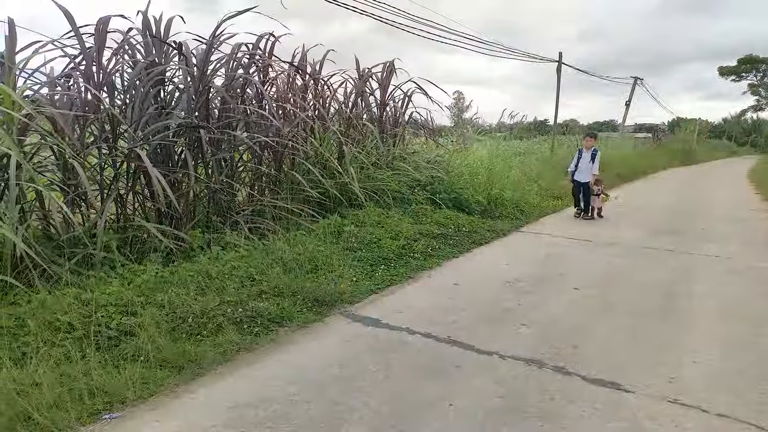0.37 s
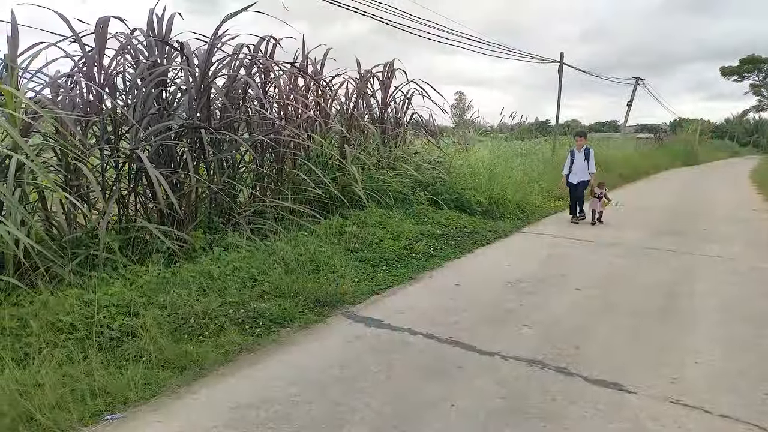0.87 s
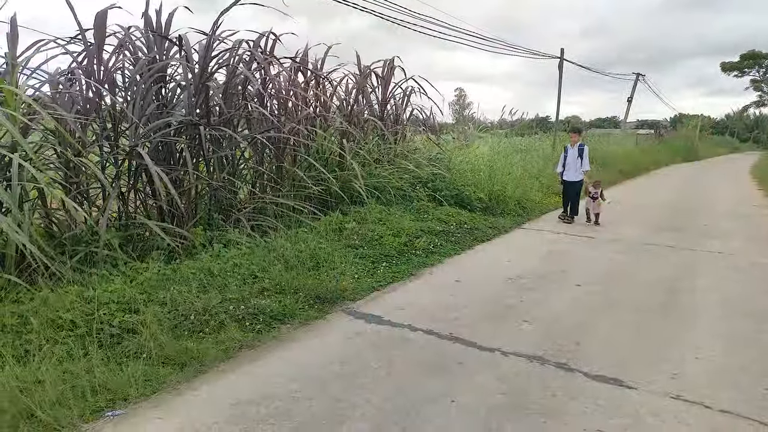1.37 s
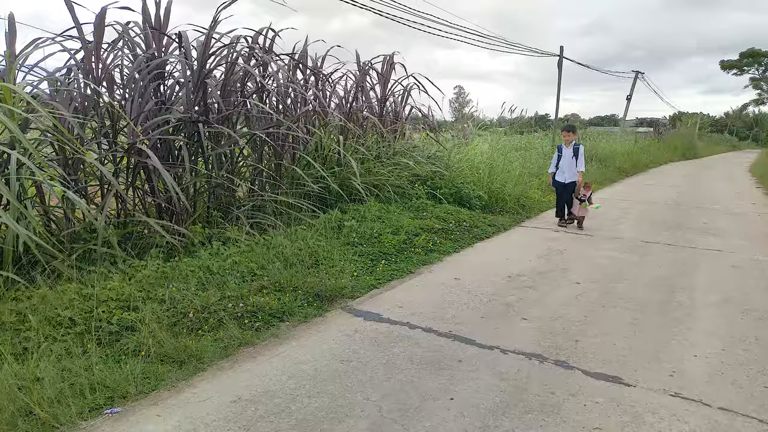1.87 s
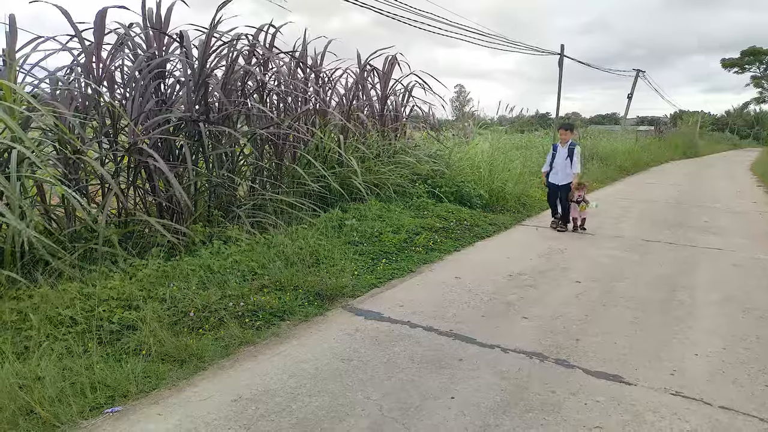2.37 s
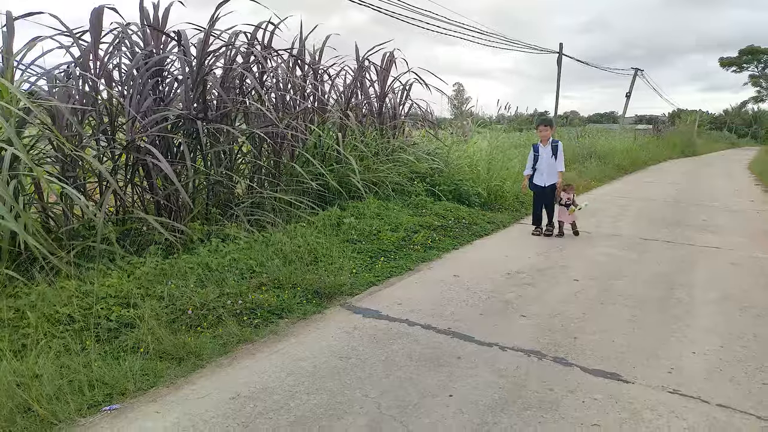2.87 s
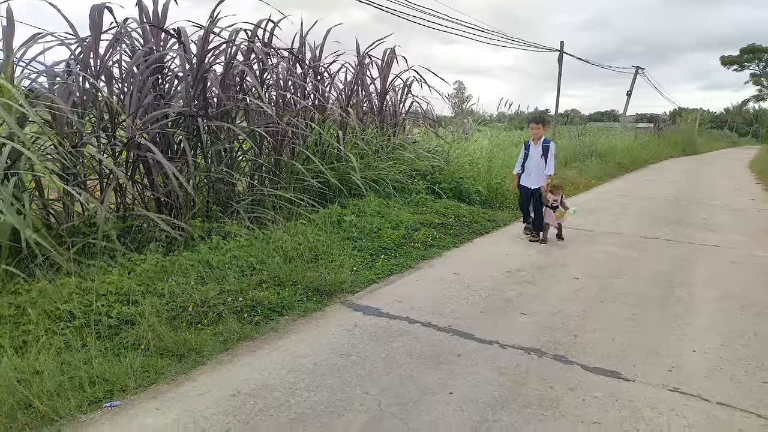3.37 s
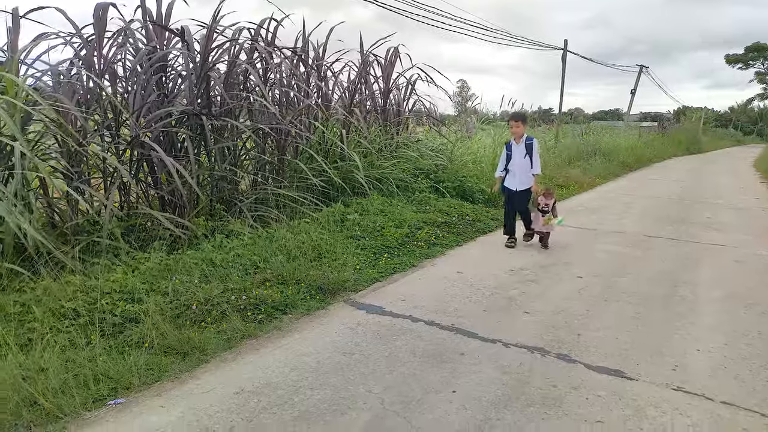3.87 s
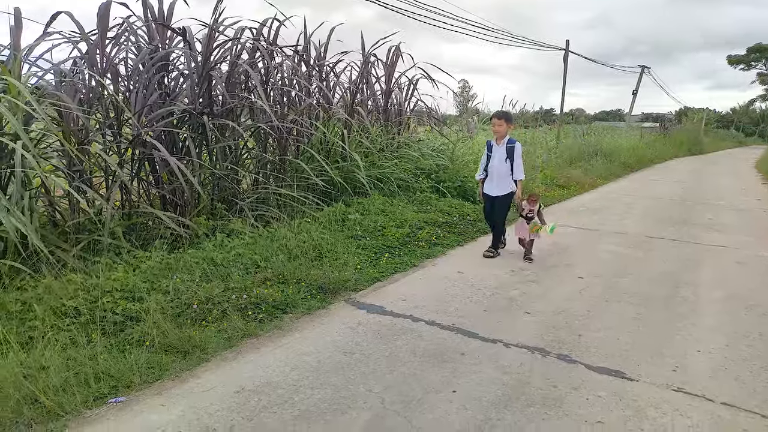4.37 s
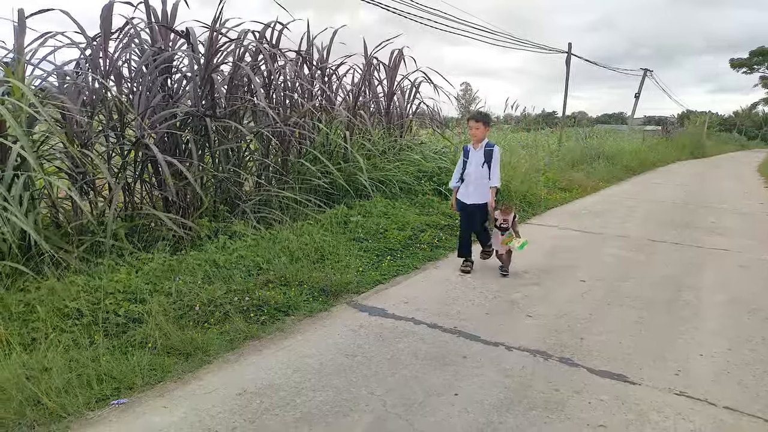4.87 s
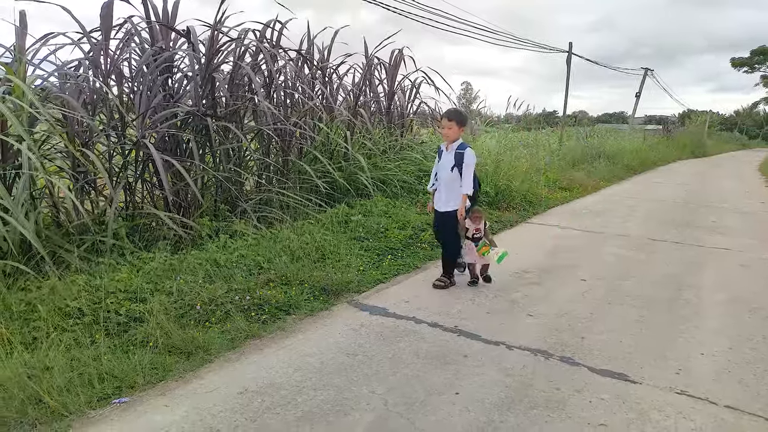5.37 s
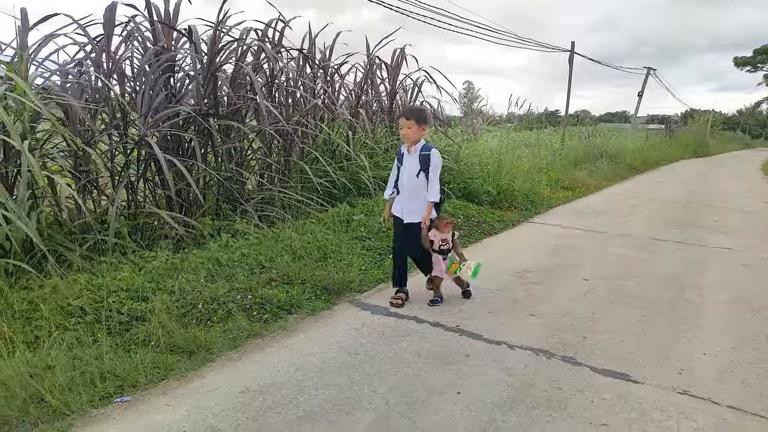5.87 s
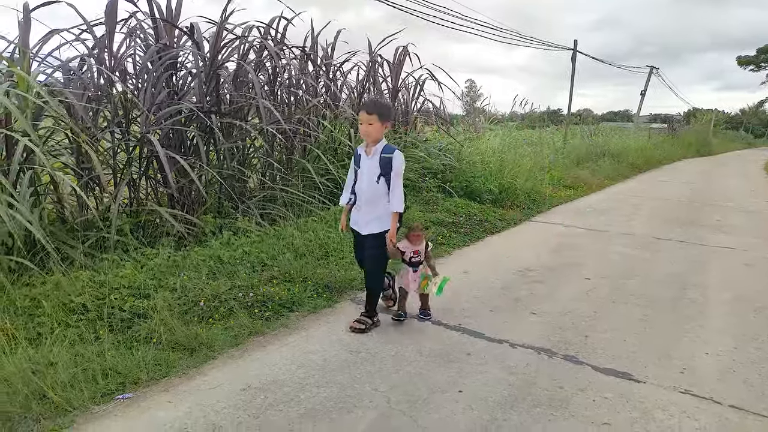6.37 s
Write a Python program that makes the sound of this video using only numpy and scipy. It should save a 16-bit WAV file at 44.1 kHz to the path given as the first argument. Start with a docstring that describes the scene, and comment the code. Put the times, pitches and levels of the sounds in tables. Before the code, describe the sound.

A quiet field is filled with a very high insect trill and repeated cricket chirps. A tumbling bird call opens, then thin whistles follow at about two seconds. Dry sandal scrapes, sharp pebble clicks and soft pats approach irregularly, most strongly near the end. Wind rumbles mainly at the left of the open-air stereo microphone, with only short, scattered echoes off the plants.

```python
"""Leaves rustle, katydids trill and two far birds call, while sandals scuff along a lane, small feet patting.
Scuffs are filtered noise and ringing grains, pebbles and footfalls are decaying sines, and birds are
gliding sines. Crickets sound in pulsed wing strokes, katydids in falling rasps. Wind is low noise with
sharp swings on each port, leaves are patchy noise, and scattered echoes follow the near sounds and birds."""
import sys
import numpy as np
from scipy import signal
from scipy.fft import rfft, irfft, next_fast_len
from scipy.io import wavfile
from scipy.ndimage import uniform_filter1d, map_coordinates

SR = 44100
rng = np.random.default_rng(int(sys.argv[2]) if len(sys.argv) > 2 else 0)


def store_wav(level_fs):
    """Save 16-bit WAV to argv[1]."""
    pcm = np.round(np.clip(np.atleast_2d(level_fs), -1, 1) * 32767)
    wavfile.write(sys.argv[1], SR, pcm.T.astype(np.int16))


def linear_from_db(decibels):
    """Turn decibels (scalar or array-like) into linear amplitude factors; 0 gives 1."""
    return 10 ** (np.asarray(decibels, float) / 20)


N = 286517  # samples


def steps():
    """Interaural delay: the walkers pass from the right to the centre, so the left port's lag shrinks."""
    left, right = scuffs() + ticks() + pats() + squeak()
    lag = np.linspace(6.5, -0.8, N)  # samples
    return np.array([map_coordinates(left, [np.arange(N) - lag], order=3), right])


# Sandal drags over grit and faint small-animal shuffles:
# onset t/s, length t/s, first level/dB, last level/dB, treble gain level/dB
DRAGS = [(0.143, 0.055, -71, -52, 13), (0.624, 0.12, -59, -62, 5), (1.709, 0.048, -47.5, -55.5, 15.5),
         (2.182, 0.061, -56, -59.5, 16), (2.65, 0.087, -53, -50.5, 9.5), (3.118, 0.032, -51, -51, 1),
         (3.145, 0.096, -44.5, -62.5, 12.5), (3.681, 0.012, -47, -52.5, 13.5),
         (3.713, 0.035, -48, -45.5, 14.5), (4.683, 0.032, -48.5, -51.5, 1),
         (4.719, 0.069, -47.5, -45.5, 11.5), (5.248, 0.05, -54.5, -56, 10.5), (5.61, 0.08, -73, -65, 8),
         (5.723, 0.05, -38.5, -39.5, 7), (5.777, 0.032, -43.5, -34, 5.5), (5.892, 0.14, -74, -59.5, -16),
         (6.225, 0.071, -49, -60, 11), (6.279, 0.21, -63.5, -72, -2)]
# Spectrum of the gritty dust: f/Hz, relative density level/dB per Hz
GRIT_SPECTRUM = [(400, -27), (620, -3.5), (1340, -5), (2200, 0.5), (3420, -3.5), (5850, -10.5),
                 (7250, -20.5), (15600, -38)]


def scuffs():
    """Frictional excitation: clumped drags with sharp edges drive dust noise, grit grains and a sole resonance."""
    level, treble = np.zeros(N), np.zeros(N)
    for s, length, first_db, last_db, treble_db in DRAGS:
        t = np.arange(round((length + 0.047) * SR)) / SR
        times = [0, length, length + 0.012, length + 0.022]
        drag = linear_from_db(np.interp(t, times, [first_db, last_db, last_db - 17.0, last_db - 21.5]))
        add(level, s, drag * (1 - np.exp(-t / 0.00014)))
        add(treble, s, drag * (1 - np.exp(-t / 0.00083)) * linear_from_db(treble_db))
    dust = colour(rng.standard_normal((3, N)), GRIT_SPECTRUM)
    low = signal.sosfiltfilt(signal.butter(2, 4300, fs=SR, output="sos"), dust)
    high = dust - low
    grit = colour(grains(900), [(700, -12), (2000, 0), (8000, 0)])
    body = 0.6 * low[0] + 0.75 * grit
    sole_hz, sole_width_hz, sole_db = 3240, 1400, -6.5
    ring = unit(signal.lfilter(*signal.iirpeak(sole_hz, sole_hz / sole_width_hz, SR), body))
    body = patchy(body + linear_from_db(sole_db) * ring, depth_db=2.5)
    bright = 0.35 * high[0] + 0.75 * high[1:]  # a shared part plus one of each port's own
    return linear_from_db(2.5 * wobble(150)) * (level * body + treble * bright)


def grains(rate):
    """Granular impacts: rate grains a second ring for a few cycles at random pitches, very unequal in size."""
    r, t = rng.random((round(rate * N / SR), 3)), np.arange(SR // 400) / SR
    hz = 1600 * 3 ** r[:, 1:2]
    size = linear_from_db(-3.3 * np.log(r[:, 2:] + 0.01))
    rings = size * t * hz * np.exp(-t * hz / 0.34) * np.sin(2 * np.pi * hz * t)
    at = (r[:, :1] * N).astype(int) + np.arange(len(t))
    return unit(np.bincount(at.ravel(), rings.ravel())[:N])


def patchy(x, depth_db):
    """Spectro-temporal modulation: smoothed random gain varies over time and frequency."""
    z = signal.stft(x, nperseg=256)[2]
    patches = uniform_filter1d(rng.standard_normal(z.shape[-2:]), size=4, axis=0)
    patches = uniform_filter1d(patches, size=5, axis=1)
    return unit(signal.istft(z * linear_from_db(depth_db * unit(patches)), nperseg=256)[1][..., :N])


# Pebbles cracking under a sole: onset t/s, level/dB before mode weights, nominal lowest mode f/Hz
PEBBLES = [(0.199, -39, 2720), (1.721, -26, 3400), (1.7373, -29.5, 3300), (1.853, -42.5, 2670),
           (1.979, -38, 2930), (2.191, -29.5, 3400), (2.657, -33.5, 2900), (3.144, -28, 3340),
           (3.149, -24.5, 3500), (3.846, -43.5, 3200), (4.7212, -27.5, 3030), (4.7264, -27.5, 2580),
           (4.744, -29.5, 2930), (4.747, -32, 2670), (5.5862, -40.5, 3380), (5.771, -22, 2470),
           (5.8066, -23, 2920), (6.2305, -25.5, 2590)]


def ticks():
    """Modal ringing: a cracking pebble sounds three short inharmonic modes, the lowest strongest."""
    out, t = np.zeros(N), np.arange(SR // 50) / SR
    for (s, db, hz), r in zip(PEBBLES, rng.standard_normal((len(PEBBLES), 3))):
        modes_hz = hz * np.array([1, 1.45, 1.9]) * (1 + [0.02, 0.09, 0.09] * r)
        ring = linear_from_db([6.5, 1, -2]) @ np.sin(2 * np.pi * np.outer(modes_hz, t))
        envelope = linear_from_db(db - 60 * t / 0.0045) * (1 - np.exp(-t / 0.0003))
        add(out, s, envelope * ring)
    return out


# Heels and small feet landing: onset t/s, level/dB of the knock, centre f/Hz
FOOTFALLS = [(0.294, -54.5, 280), (0.367, -55.5, 581), (0.531, -54.5, 353), (0.851, -57.5, 599),
             (2.422, -62, 586), (2.649, -56.5, 651), (2.883, -57.5, 543), (3.41, -59.5, 566),
             (3.68, -49, 572), (3.91, -54.5, 547), (4.46, -51, 281), (5.268, -58.5, 263), (5.5, -59.5, 760),
             (5.772, -48, 300), (5.964, -53.5, 649), (6.23, -52.5, 339)]


def pats():
    """Damped impact: a soft sole on the slab gives a phase-roughened knock over a low thud."""
    out, t = np.zeros(N), np.arange(SR // 8) / SR
    for (s, db, hz), r in zip(FOOTFALLS, rng.standard_normal((len(FOOTFALLS), len(t)))):
        slip = 14 * uniform_filter1d(r, size=150)  # radians
        knock = np.sin(2 * np.pi * hz * t + slip)
        thud = 0.5 * np.sin(2 * np.pi * 240 * t - slip)
        add(out, s, linear_from_db(db - 60 * t / 0.13) * (1 - np.exp(-t / 0.00012)) * (knock + thud))
    return out


# Faint rising squeak: onset t/s, length t/s, first f/Hz, last f/Hz, fundamental level/dB
SQUEAK_GLIDE = (5.59, .06, 620, 730, -78)


def squeak():
    """Harmonic tone: a short gliding fundamental lies under a stronger octave."""
    s, hz, db = glide(*SQUEAK_GLIDE)
    return whistled([(s, hz, db), (s, 2 * hz, db + 5)], 0.01)


# First bird, tumbling notes: onset t/s, nominal f/Hz, level/dB
TUMBLING_NOTES = [(0.077, 3395, -59.5), (0.088, 3760, -57.5), (0.447, 4015, -45.5), (0.476, 3740, -48.5),
                  (0.5, 3530, -57), (.526, 3105, -54.5), (0.551, 2760, -57.5), (1.033, 4150, -52.5),
                  (1.063, 3515, -49), (1.094, 3170, -53), (1.112, 2910, -55), (1.152, 2620, -56.5),
                  (1.196, 2200, -58.5)]
# First bird, slurs: onset t/s, length t/s, first f/Hz, last f/Hz, level/dB
SLURRED_NOTES = [(0.112, 0.045, 3660, 2910, -60), (0.1, 0.027, 3950, 4940, -63),
                 (0.127, .062, 4940, 3210, -58)]
# Reflections of the first bird from distant banks: delay t/s, mean level/dB
BANK_ECHOES = [(.16, -16), (.239, -6.5)]
# Second bird: onset t/s, length t/s, held f/Hz, final fall f/Hz, level/dB
WHISTLED_NOTES = [(0.041, 0.044, 2394, 37, -62), (.088, 0.037, 2340, 0, -62), (.13, 0.042, 2370, 0, -60.5),
                  (1.603, 0.08, 2400, 62, -65.5), (1.694, 0.14, 2300, 115, -60),
                  (1.834, .24, 2341, 171, -57), (2.079, 0.097, 2240, 98, -59.5),
                  (2.221, 0.18, 2313, 180, -68)]


def birds():
    """Frequency modulation and reflection: gliding tones, the first bird's returning late, dull and flickering."""
    u = np.linspace(0, 1, round(0.031 * SR))  # the span of a tumbling note
    slide_in, upturn = 0.08 * np.exp(-u / 0.12), 0.05 * (u ** 3 - 0.4)  # shares of the pitch
    notes = [(s, hz * (1 + slide_in + upturn), db) for s, hz, db in TUMBLING_NOTES]
    first = whistled(notes + [glide(*row) for row in SLURRED_NOTES], 0.0094)
    out = first + whistled([droop(*row) for row in WHISTLED_NOTES], 0.0072)
    dull = signal.sosfilt(signal.butter(2, 3800, fs=SR, output="sos"), first)
    for delay, db in BANK_ECHOES:
        add(out, delay, linear_from_db(db + 3 * wobble(30)) * dull)
    return out


def whistled(notes, waver):
    """Phase integration: sines follow (onset s, Hz per sample, dB) with soft ends, wavering in pitch and level."""
    out, bend = np.zeros(N), 1 + waver * wobble(90)
    for s, hz, db in notes:
        t = np.arange(len(hz)) / SR
        ends = np.clip(np.minimum(t, t[::-1]) / 0.005, 0, 1)
        phase = 2 * np.pi * np.cumsum(hz * bend[round(s * SR):][:len(t)]) / SR
        add(out, s, linear_from_db(db) * ends * np.sin(phase))
    return out * linear_from_db(1.8 * wobble(45))


def glide(s, length, first_hz, last_hz, db):
    """Linear chirp: pitch moves at a constant rate."""
    return s, np.linspace(first_hz, last_hz, round(length * SR)), db


def droop(s, length, hz, fall_hz, db):
    """Pitch relaxation: a note starts sharp, settles exponentially and falls late; longer notes start sharper."""
    t = np.arange(round(length * SR)) / SR
    flick_hz_per_s, settle_s, fall_power = 930, 0.0161, 3.5
    flick = flick_hz_per_s * length * np.exp(-t / settle_s)
    return s, hz + flick - fall_hz * (t / length) ** fall_power, db


# Crickets: left-right level/dB, nominal f/Hz, chirps a phrase (rounded), chirp rate f/Hz,
# phrases of (last chirp t/s, nominal level/dB)
CHIRPERS = [(0.5, 4590, 7.45, 22.4, [(0.309, -53.5), (.943, -54), (1.602, -53), (2.319, -55),
            (3.118, -54.5), (3.889, -55), (4.597, -53), (5.312, -54), (6.139, -58.5)]),
            (-10, 4640, 10.25, 24, [(0.551, -60), (2.278, -57.5), (3.522, -56.5), (4.63, -57),
            (6.035, -59)])]


def crickets():
    """Pulsed stridulation: each chirp is three wing strokes, and a phrase tends to grow chirp by chirp."""
    out = np.zeros((2, N))
    for pan_db, pitch_hz, chirps, rate, phrases in CHIRPERS:
        for last, db in phrases:
            hz = pitch_hz + rng.normal(0, 29)
            for left in range(round(chirps)):  # chirps still to come
                grow_db = -9 * (left / chirps) ** 2 + rng.normal(0, 0.56)
                for j, weight in enumerate((0.9, 1.05, 0.55)):
                    size = weight * linear_from_db(db + grow_db + rng.normal(0, 0.35)) * sides(pan_db)
                    tone = stroke(hz + rng.normal(0, 40), 0.0085, 0.7)
                    add(out, last - left / rate + j * 0.0118, size * tone)
    return out


def far_cricket():
    """Pulsed stridulation: a higher cricket gives eleven strokes a chirp, about four chirps a second."""
    out = np.zeros(N)
    for start in 0.06 + 0.2388 * np.arange(27):
        db = -72.5 + rng.normal(0, 1)
        for j in range(11):
            tone = stroke(6900 + rng.normal(0, 90), 0.011, 0.8)
            add(out, start + j * 0.0135, linear_from_db(db + rng.normal(0, 3)) * tone)
    return out * sides(0.025)


def stroke(hz, length, rise):
    """Resonant wing stroke: a tone swells, fades and sags slightly in pitch."""
    t = np.arange(round(length * SR)) / SR
    phase = 2 * np.pi * hz * t * (1 - 0.01 * t / length) + rng.uniform(0, 2 * np.pi)
    return np.sin(np.pi * (t / length) ** rise) * np.sin(phase)


# Far katydids together: f/Hz, relative density level/dB per Hz
CHORUS_SPECTRUM = [(7700, -45), (8300, -16), (8900, -3), (9900, 0), (10700, -7), (11100, -35), (12000, -80)]


def katydids():
    """Superposition: one near on the right (late at the left port), one on the left, and a chorus blurred to hiss."""
    right = linear_from_db(-67.5) * katydid(108.5, 1.4) * sides(-9)
    left = linear_from_db(-70) * katydid(101.7, 0.4) * sides(11)
    near = [np.roll(right[0], 2) + left[0], right[1] + left[1]]
    chorus = colour(rng.standard_normal((2, N)), CHORUS_SPECTRUM) * sides(1.5)
    return near + linear_from_db(-64.5) * chorus


def katydid(rate, sway):
    """File-and-scraper stridulation: the scraper slows in each stroke, a rasp falling from about 10.7 to 8.8 kHz."""
    stage = np.cumsum(rate + sway * wobble(1.1) + 4 * wobble(60)) / SR % 1  # place within the stroke
    hz = 10650 - 2100 * stage + 120 * wobble(900)
    swell = np.sin(np.pi * np.clip(stage / 0.85, 0, 1)) ** 1.4
    rasp = swell * linear_from_db(0.29 * wobble(700)) * np.sin(2 * np.pi * np.cumsum(hz) / SR)
    return unit(rasp) * linear_from_db(0.2 * wobble(3.27))


# Strongest eddies bursting on a port: centre t/s, level/dB, decay rate /s^-1 (also sets the swing),
# port (1 left, -1 right)
EDDIES = [(0.471, -36.5, 45.3, 1), (0.568, -28.5, 69.6, 1), (1.074, -44, 25.7, -1),
          (1.293, -37.5, 56.6, -1), (2.808, -37, 34.3, 1), (2.905, -23, 51, 1), (3.023, -40, 76, 1),
          (4.721, -34.5, 63.4, 1), (4.747, -21, 42, 1), (4.804, -20, 84, 1), (4.886, -28.5, 73, 1),
          (4.953, -29, 70.5, 1), (4.988, -18, 69, 1), (5.037, -22, 98.6, 1), (5.092, -21, 65, 1),
          (5.141, -32.5, 34.3, 1), (5.254, -27, 47, 1), (5.542, -34.5, 46, 1), (6.079, -39, 29, 1)]
# Buffeting before lumps and panning: t/s, level/dB
BUFFETING = [(0, -68.5), (2.3, -69), (3.5, -67), (4.5, -76), (5.2, -57), (6.5, -67)]
# Wind rumble: f/Hz, relative density level/dB per Hz
RUMBLE_SPECTRUM = [(12, -62), (25, 3), (55, -0.5), (110, -7.5), (200, -14), (380, -47.5), (650, -85)]


def wind():
    """Turbulent pressure: ports buffet separately; an eddy is a sharp swing between slower ones, in a short flutter."""
    s, db = np.transpose(BUFFETING)
    lumps = linear_from_db(3.5 * np.array([wobble(12), wobble(12)]))
    level = linear_from_db(np.interp(np.arange(N) / SR, s, db)) * lumps * sides(9.1)
    out, t = np.zeros((2, N)), np.arange(-SR // 12, SR // 12) / SR
    for (s, db, hz, port), (sign, skew) in zip(EDDIES, rng.uniform(-0.89, 1, (len(EDDIES), 2))):
        channel = int(port < 0)
        away = np.hypot(t, 0.004)  # rounded distance from the centre, seconds
        swing = np.cos(2 * np.pi * hz * 1.2 * t / (1 + 22 * away) + 0.5 * skew) * np.exp(-away * hz)
        add(out[channel], s + t[0], np.sign(sign) * linear_from_db(db) * swing)
        add(level[channel], s + t[0], linear_from_db(db - 6.5) * np.exp(-(t / 0.016) ** 2))
    return out + level * colour(rng.standard_normal((2, N)), RUMBLE_SPECTRUM)


# Far leaves and insects: f/Hz, relative density level/dB per Hz
FIELD_SPECTRUM = [(35, -2.5), (60, -7.5), (119, -12), (198, -12), (713, -21), (1270, -21.5), (4470, -19.5),
                  (5490, -26), (8300, -35.5), (10800, -92), (18300, -120)]
# Mean course of the leaves: t/s, level/dB
LEAF_LEVEL = [(0, -60), (2.4, -62.5), (5.2, -60.5), (5.8, -58), (6.5, -59.5)]


def field():
    """Diffuse field: patchy leaf noise, its waveform unrelated left and right."""
    z = signal.stft(rng.standard_normal((2, N)), nperseg=512)[2]
    patches = uniform_filter1d(rng.standard_normal(z.shape[1:]), size=8, axis=0)
    patches = uniform_filter1d(patches, size=10, axis=1)
    pair = signal.istft(z * linear_from_db(2.4 * unit(patches)), nperseg=512)[1][:, :N]
    s, db = np.transpose(LEAF_LEVEL)
    level = linear_from_db(np.interp(np.arange(N) / SR, s, db) + wobble(2))
    return level * colour(pair, FIELD_SPECTRUM)


# Echoes off the cane: f/Hz, 60 dB decay t/s before the distance factor
CANE_DECAY = [(300, 0.043), (3000, 0.44), (12000, 0.0083)]


def echoes(x, far):
    """Frequency-dependent reverberation: scattered tails differ by side; the factor far lengthens the decay."""
    hz, t, z = signal.stft(rng.standard_normal((2, SR // 2)), SR, nperseg=256)
    decay_s = far * along(CANE_DECAY, hz)[:, None]
    tail = signal.istft(z * linear_from_db(-60 * t / decay_s), SR, nperseg=256)[1]
    return signal.fftconvolve(x, tail / np.linalg.norm(tail[0]), axes=1)[:, :N]


def unit(x):
    """Normalisation: scales to rms 1."""
    return x / np.sqrt(np.mean(x ** 2) + 1e-20)


def along(points, hz):
    """Logarithmic interpolation: reads (Hz, value) points on a log frequency axis."""
    f, v = np.transpose(points)
    return np.interp(np.log(hz + 1), np.log(f + 1), v)


def wobble(rate):
    """Band-limited fluctuation: a smooth random curve with rate knots a second."""
    knots = rng.standard_normal(int(N * rate / SR) + 4)
    return map_coordinates(knots, [np.arange(N) * rate / SR])


def colour(x, spectrum):
    """Linear filtering: shapes x by a (Hz, dB) spectrum, at rms 1."""
    m = next_fast_len(N + 8192)
    gain = linear_from_db(along(spectrum, np.fft.rfftfreq(m, 1 / SR)))
    return unit(irfft(rfft(x, m) * gain, m)[..., :N])


def add(track, s, sound):
    """Superposition: mixes a sound in at time s."""
    part = track[..., max(round(s * SR), 0):][..., :sound.shape[-1]]
    part += sound[..., :part.shape[-1]]


def sides(pan_db):
    """Level difference: left and right gains pan_db apart."""
    return linear_from_db(np.array([[pan_db / 2], [-pan_db / 2]]))


def scene():
    """Superposition: near sounds and birds with their echoes, over katydids, gusting wind and leaves."""
    walk, song, chirps = steps(), birds(), crickets() + far_cricket()
    wet = echoes(linear_from_db(-12.5) * walk + linear_from_db(-10.5) * chirps, 0.29)
    wet += linear_from_db(-9) * echoes(song[None], 0.9)
    return walk + song + chirps + wet + katydids() + wind() + field()


def low_pass(x):
    """Removes everything above the highest recorded frequency."""
    return signal.sosfilt(signal.butter(12, 15740, fs=SR, output="sos"), x)


def record(dry):
    """Signal chain: the finished mix passes through the last stage."""
    return low_pass(dry)


dry = scene()
out = record(dry)
store_wav(out)
```